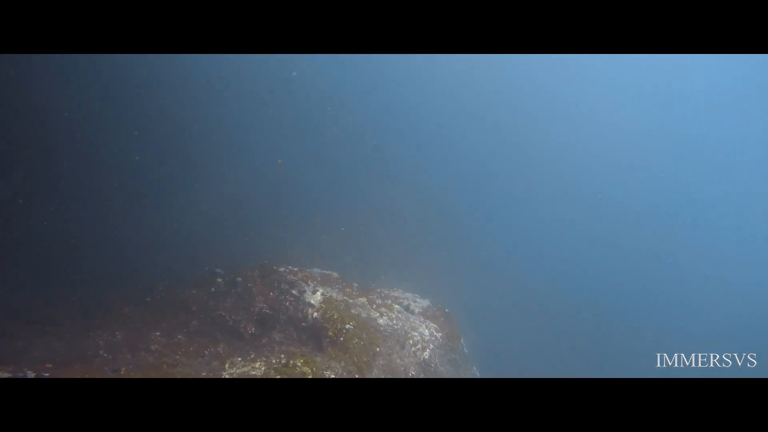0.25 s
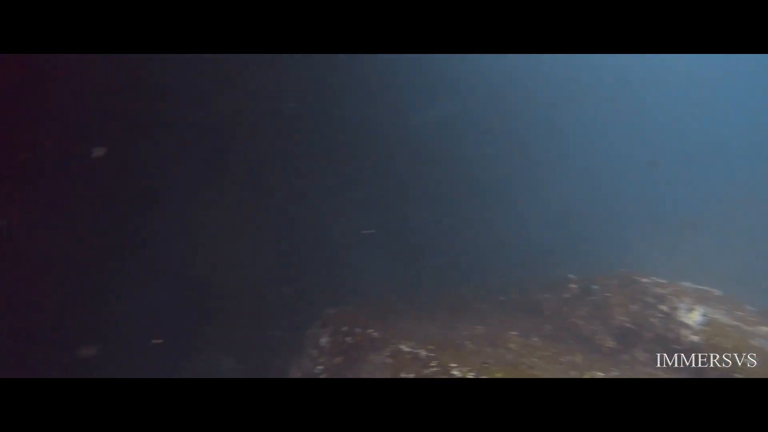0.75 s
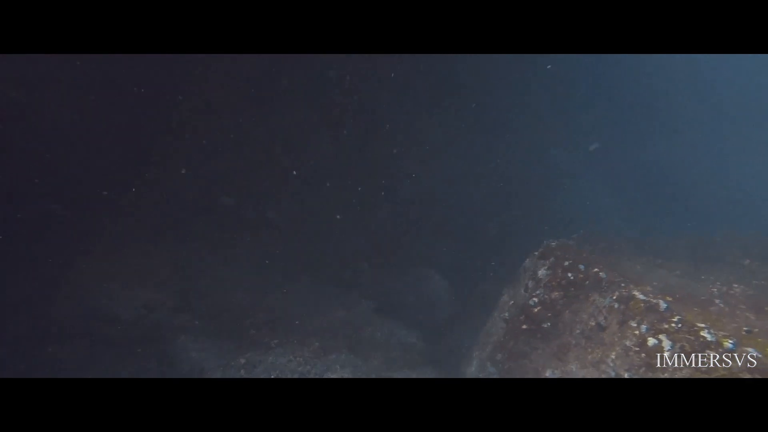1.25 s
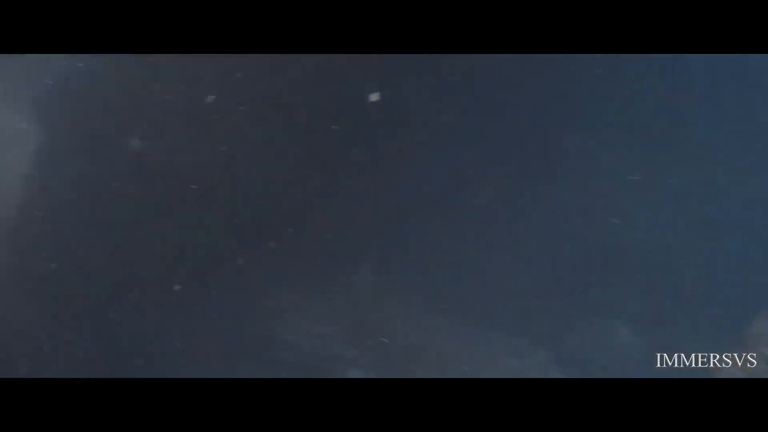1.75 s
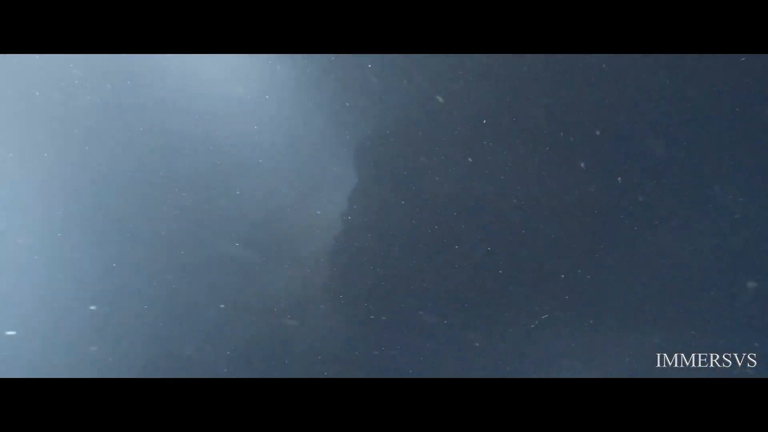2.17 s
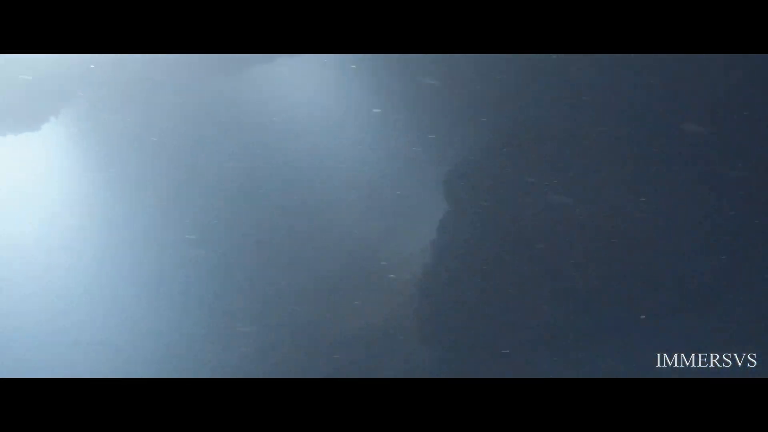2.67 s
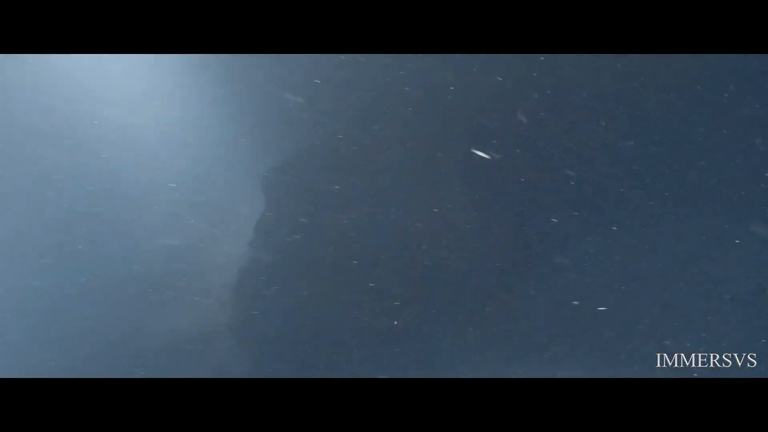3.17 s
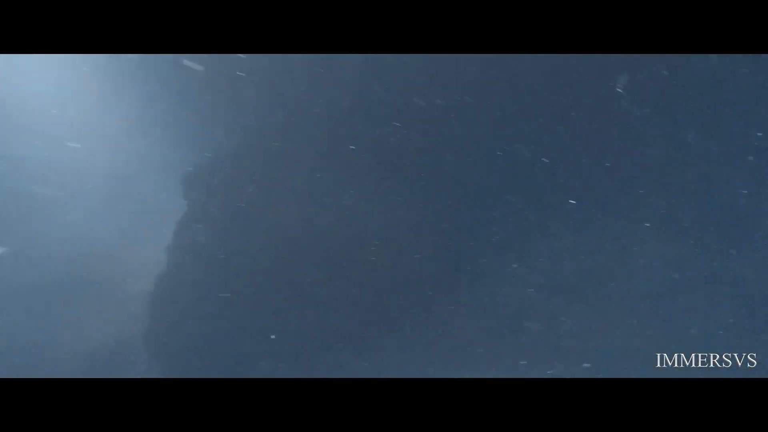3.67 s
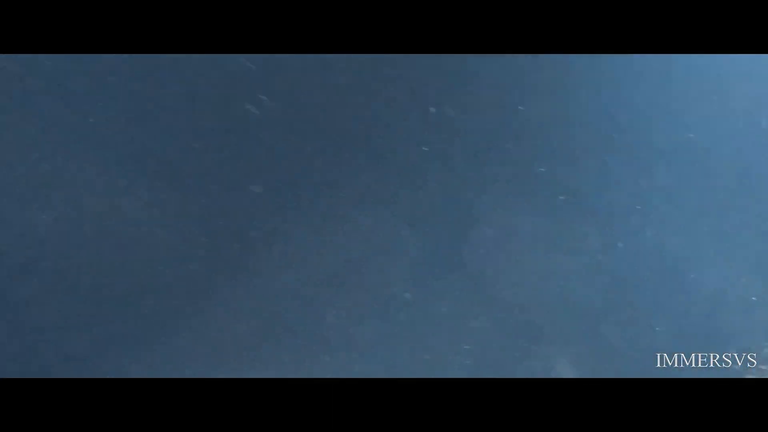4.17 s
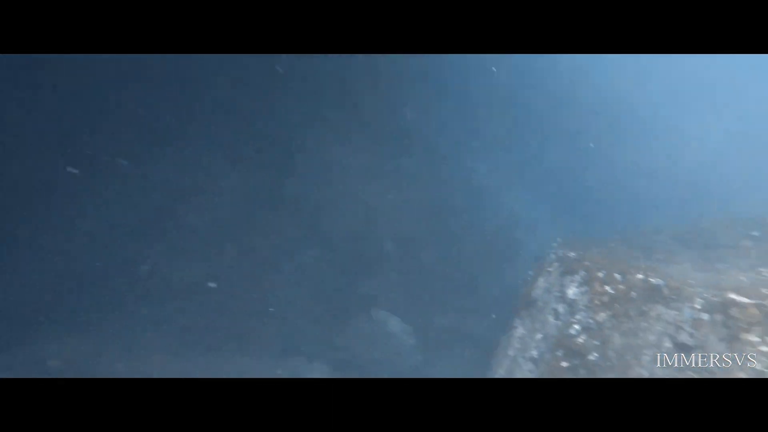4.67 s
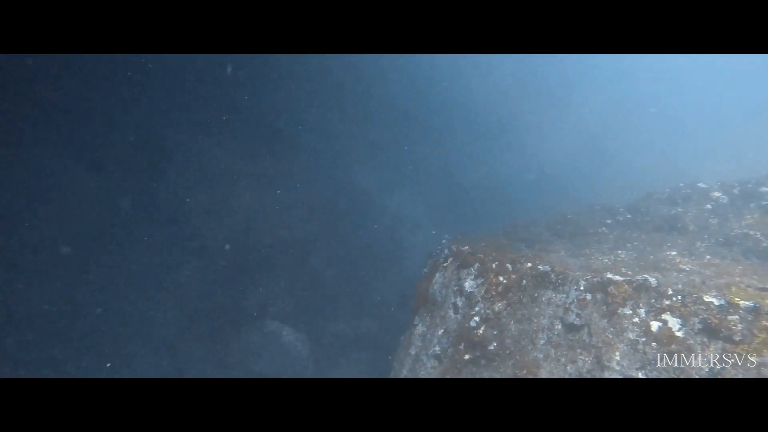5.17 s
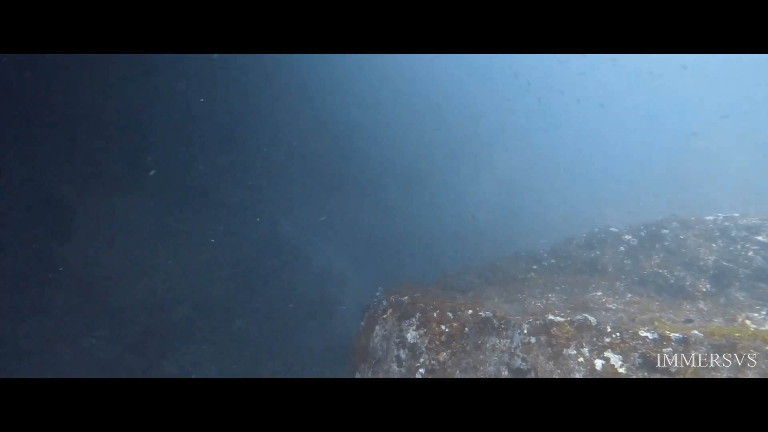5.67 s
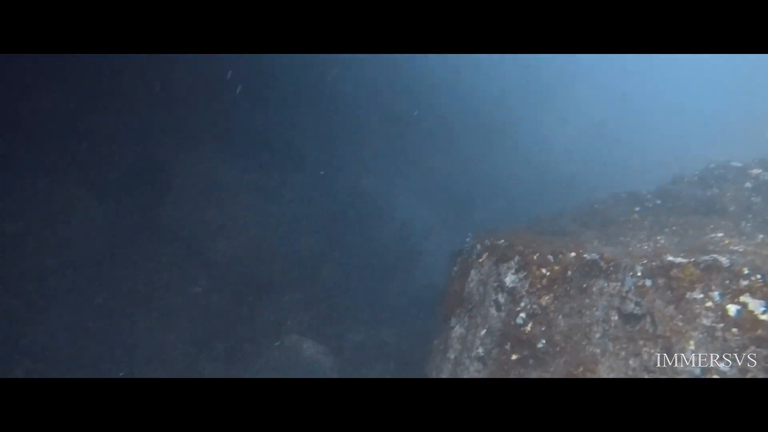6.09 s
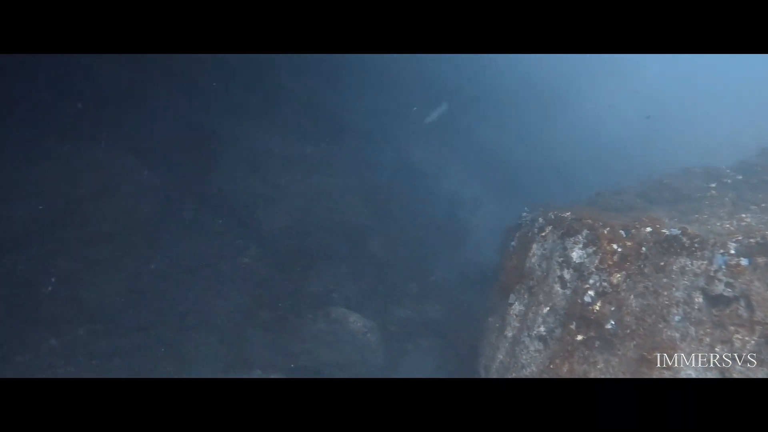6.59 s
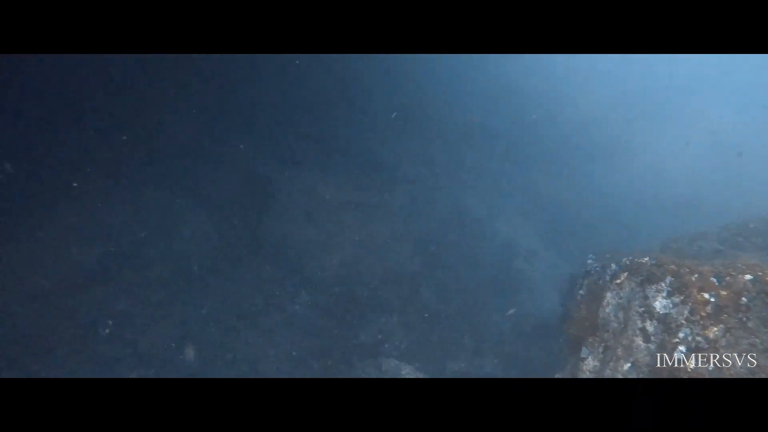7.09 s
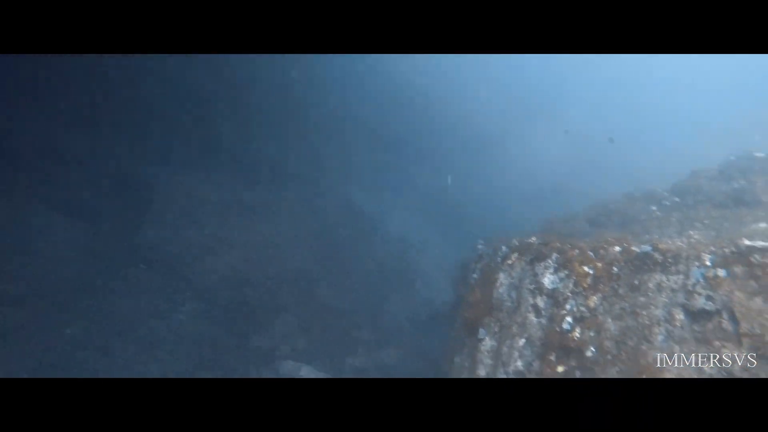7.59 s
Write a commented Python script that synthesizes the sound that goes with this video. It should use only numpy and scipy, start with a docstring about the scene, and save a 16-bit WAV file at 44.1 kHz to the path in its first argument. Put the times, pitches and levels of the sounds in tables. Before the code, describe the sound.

Countless small shrimp snaps fizz and pop around a submerged microphone, with brighter echoing cracks, dull low thumps and faint water rumbling underneath.

```python
"""Snapping shrimp crackle all around a camera in a dive housing that drifts over a rocky reef.
Near shrimp are sharp cracks with a wash of rock echoes; far ones are a fizz of countless small ticks over noise.
The resonances of the housing colour them all. Ringing modes make one short rattle of the housing and its soft
bumps, stick-slip pulses make the grip rub, and filtered noise makes the water that rumbles past."""
import sys
import numpy as np
from scipy import signal
from scipy.fft import rfft, irfft
from scipy.io import wavfile

SR = 44100
rng = np.random.default_rng(int(sys.argv[2]) if len(sys.argv) > 2 else 0)


def wrap_up_sound(samples):
    """Save the sound to the file named by the first command line argument, as 16-bit audio."""
    columns = np.atleast_2d(samples).T
    # keep every value between -1 and 1, then stretch to whole-number steps
    tamed = np.clip(columns, -1, 1)
    steps = np.round(tamed * 32767).astype(np.int16)
    wavfile.write(sys.argv[1], SR, steps)


N = 345744

PIVOT_HZ = 3750  # spectral tilts turn around this pitch
CUTOFF_HZ = 15400  # top of the microphone signal
SIZE = 8192  # samples in a filter, an echo tail or a struck mode
HZ = np.maximum(np.arange(SIZE // 2 + 1) * SR / SIZE, 1)
AGE = np.arange(SIZE) / SR  # seconds since an event began


def from_db(db):
    """Decibels to gain."""
    return 10 ** (np.asarray(db) / 20)


def rms_one(x):
    """Scale to an rms of one."""
    return x / np.sqrt(np.mean(x ** 2) + 1e-20)


def in_time(rows):
    """Draw straight lines between the rows of a curve: each column at every sample."""
    s, *columns = np.transpose(rows)
    return [np.interp(np.arange(N) / SR, s, c) for c in columns]


def add(out, s, sound):
    """Mix a sound in at a time in seconds."""
    start = max(int(s * SR), 0)
    out[start:start + len(sound)] += sound[:N - start]


def butter(x, hz, kind, order=2):
    """Butterworth filter: a smooth low or high cut."""
    sos = signal.butter(order, np.clip(hz, 10, .45 * SR), kind, fs=SR, output="sos")
    return signal.sosfilt(sos, x)


def impulse(gain):
    """The most compact causal pulse with this spectrum (minimum phase), scaled to an energy of one."""
    cepstrum = irfft(np.log(gain / gain.max() + 1e-5))
    # fold the cepstrum onto positive time
    cepstrum[1:SIZE // 2] *= 2
    cepstrum[SIZE // 2 + 1:] = 0
    pulse = irfft(np.exp(rfft(cepstrum)))
    return pulse / np.linalg.norm(pulse)


def colour(x, gain):
    """Pass a sound through a causal filter with the shape of this spectrum."""
    return signal.oaconvolve(x, impulse(gain))[:len(x)]


def hump(hz, width_hz):
    """A resonance peak of height one."""
    return 1 / (1 + (2 * (HZ - hz) / width_hz) ** 2)


def resonances(table):
    """Gain of a set of resonance peaks, summed in power."""
    return np.sqrt(sum((from_db(db) * hump(hz, width)) ** 2 for hz, width, db in table))


def ring(hz, t60):
    """A struck mode: a sine that falls by 60 dB in t60 seconds."""
    return np.sin(2 * np.pi * hz * AGE) * from_db(-60 * AGE / t60)


def near_snaps(echo_trim_db=1):
    """The nearest shrimp: single loud cracks, each with its own pitch and echo."""
    # The nearest snaps. Each row: start in seconds, crack level in dB, pitch favoured by the path in Hz,
    # its emphasis in dB, echo level in dB ahead of the trim.
    cracks = [(0.147, -33.5, 3310, 49, -52), (0.3403, -21, 5600, 18, -41), (0.371, -34.5, 8160, 9, -53),
              (0.5997, -35, 6800, 36, -40), (0.67, -29.5, 4200, 6, -43), (0.6956, -23.5, 11200, 8.5, -58),
              (0.7226, -36, 2800, 2, -45), (0.771, -31.5, 4100, 19, -60), (0.832, -40.5, 4100, 23, -63),
              (1.083, -36, 4340, 9, -54), (1.3476, -33, 2210, 7, -54), (1.594, -43, 3400, -1, -43),
              (1.6854, -45, 4500, 6, -37.5), (1.8983, -33.5, 3340, 19, -41), (1.955, -36, 2200, 1, -50),
              (2.029, -43, 2200, 10, -46), (2.186, -34.5, 5660, 15, -47.5), (2.2545, -42.5, 1990, 14, -50),
              (2.2674, -41, 2000, 8, -45), (2.4614, -37.5, 4960, 7, -50), (2.6467, -32, 4900, 15, -58),
              (2.6838, -35.5, 8000, 13, -43.5), (2.734, -39.5, 6840, 11, -45.5),
              (2.8355, -31.5, 3680, 7, -51), (2.857, -28, 4550, 15, -44), (2.9845, -37.5, 6000, 16, -62),
              (3.0428, -40, 3250, 8, -45), (3.1615, -29.5, 4050, 9.5, -40), (3.399, -35, 9500, -4, -43),
              (3.5622, -46, 11300, 11, -50), (3.9311, -36, 2250, 9, -38.5), (4.028, -44, 7100, 16, -43),
              (4.3075, -35.5, 6200, 4, -40), (4.4148, -36, 7050, 20, -58), (4.5303, -31.5, 3940, 22, -40.5),
              (4.6694, -30.5, 6500, 8, -43), (5.0145, -42, 6900, 18, -45), (5.1286, -41, 13300, 25, -53),
              (5.1607, -23, 3940, 3, -37.5), (5.2043, -30, 7450, 13, -41), (5.5415, -31.5, 3400, 19, -40.5),
              (5.586, -45, 1960, 13, -39.5), (5.748, -39.5, 6100, 5, -40), (5.8775, -29, 5850, 8, -41),
              (5.9638, -30.5, 5600, 11, -36), (5.996, -42, 3660, 17, -60), (6.103, -46, 7200, 14, -43.5),
              (6.2304, -39, 3400, 9, -47), (6.3264, -39, 12900, 14, -52), (6.364, -32, 7940, 12, -44),
              (6.4077, -42, 6800, 7, -48), (6.477, -34.5, 3240, 28, -47), (6.5936, -31, 7260, 17.5, -41),
              (6.693, -38, 10900, 8, -54), (6.7135, -32.5, 4100, 18, -42.5), (6.883, -36.5, 10200, 15, -44),
              (7.0566, -32, 4000, 9, -41.5), (7.1131, -39.5, 6100, 16, -55),
              (7.1631, -29.5, 6800, 8.5, -40.5), (7.56, -47, 5100, 5, -45.5), (7.6535, -21, 8750, 22, -37),
              (7.685, -34.5, 4000, 36, -44.5), (7.702, -34.5, 7900, 13, -44.5)]
    out = np.zeros(N)
    for s, crack_db, favoured_hz, favour_db, echo_db in cracks:
        add(out, s, snap(crack_db, favoured_hz, favour_db, echo_db + echo_trim_db))
    return out


def snap(crack_db, favoured_hz, favour_db, echo_db, crack_s=0.0056, tilt_db=-0.43, echo_tilt_db=-1.0,
         echo_share=0.71, smear_s=0.001, smear=0.23, low_cut_hz=1700, patchy_db=1.2):
    """A claw snap is one collapsing bubble: a crack smeared by paths through the housing, then echoes."""
    own = from_db(favour_db * hump(favoured_hz, favoured_hz / 2))
    # the direct click, then a dense fading scatter
    paths = (AGE == 0) + smear * rng.standard_normal(SIZE) * np.exp(-AGE / smear_s)
    crack_gain = housing(tilt_db, low_cut_hz) * own * path_colour(patchy_db)
    crack = colour(paths, crack_gain)
    # the echoes keep only a share of the favoured pitch
    echo_gain = housing(echo_tilt_db, low_cut_hz) * own ** echo_share * path_colour(patchy_db)
    echoes = colour(rock_echoes(), echo_gain)
    # crack_db is the rms the crack's energy would have if spread over crack_s
    crack *= np.sqrt(crack_s * SR) / np.linalg.norm(crack)
    return from_db(crack_db) * crack + from_db(echo_db) * echoes


def housing(tilt_db, low_cut_hz=1150, tilt_end_hz=8000):
    """Gain of the housing walls: they resonate and shut out the bass; the tilt in dB per octave sets brightness."""
    # Housing resonances that waterborne sound comes through.
    # Each row: pitch in Hz, width in Hz, relative height in dB.
    wall_peaks = [(1267, 305, -9), (1793, 244, -6), (2093, 312, 1), (2668, 410, -8), (3455, 560, -4),
                  (3837, 410, -2), (4530, 410, -11), (5340, 500, -6.5), (6200, 910, -5), (6960, 1100, -4),
                  (7540, 750, -6), (8850, 730, -8), (9480, 930, -10.5), (11620, 1560, -13.5),
                  (13100, 3200, -13), (14750, 1500, -21)]
    octaves = np.log2(np.clip(HZ, low_cut_hz, tilt_end_hz) / PIVOT_HZ)
    bass_cut = 1 / np.sqrt(1 + (low_cut_hz / HZ) ** 8)
    return resonances(wall_peaks) * bass_cut * from_db(tilt_db * octaves)


def path_colour(spread_db, count=26):
    """Every path through the rocks cancels some pitches and favours others, here at random."""
    knots_hz = np.linspace(0, CUTOFF_HZ, count)
    return from_db(spread_db * np.interp(HZ, knots_hz, rng.standard_normal(count)))


def rock_echoes(early_t60=0.12, late_t60=0.31, late_db=-6, uneven_db=3):
    """Many uneven reflections: a quick burst from near rocks together with a longer, weaker wash."""
    # the strength jumps every 64 samples
    strengths = from_db(uneven_db * np.repeat(rng.standard_normal(SIZE // 64), 64))
    paths = rms_one(rng.standard_normal(SIZE) * strengths)
    decay = from_db(-60 * AGE / early_t60) + from_db(late_db - 60 * AGE / late_t60)
    onset = np.minimum(AGE / 0.0018, 1)
    return paths * decay * onset


def scattered_snaps(level_db=-44.5, spread_db=3.3, echo_db=-52, echo_spread_db=3, centre_hz=5400,
                    spread_octaves=0.65, favour_db=12, count=46):
    """Shrimp a little farther off snap at chance moments, each by a path of its own."""
    out = np.zeros(N)
    # one snap at a random moment in each equal slot
    times = (np.arange(count) + rng.random(count)) * N / SR / count
    for s, (size, pitch, wet) in zip(times, rng.standard_normal((count, 3))):
        crack_db = level_db + spread_db * size
        favoured_hz = centre_hz * 2 ** (spread_octaves * pitch)
        add(out, s, snap(crack_db, favoured_hz, favour_db, echo_db + echo_spread_db * wet))
    return out


def far_snaps(per_s=450, size_db=12.5, largest=3, grain_db=-3.5, wash_db=-6.5, wash_tilt_db=-2.0,
              favour_db=14, wet_db=-27, patchy_db=5.0, low_hz=3000, high_hz=13000, count=20):
    """The colony: countless small snaps of many favoured pitches over the smooth wash of the farthest."""
    # Loudness of the colony as the camera drifts over it. Each row: time in seconds, rms level in dB.
    loudness = [(0.0, -46.5), (1.0, -46.8), (1.4, -47.5), (1.68, -47), (2.0, -49), (2.2, -49.5),
                (2.45, -47), (3.4, -44), (3.82, -51.5), (4.62, -45.5), (5.0, -49), (5.3, -50), (5.8, -51.5),
                (6.1, -46.5), (6.42, -51), (7.0, -48), (7.4, -50.5), (7.84, -51)]
    colony_db, = in_time(loudness)
    grains, walls = np.zeros(N), housing(wash_tilt_db)
    # each pitch group shares one tick, struck at random moments and sizes
    for hz in np.geomspace(low_hz, high_hz, count):
        born = rng.random(N) < per_s / count / SR
        sizes = from_db(size_db * np.minimum(rng.exponential(1, N), largest))
        gain = walls * from_db(favour_db * hump(hz, hz / 2))
        click = (AGE == 0) + from_db(wet_db) * rock_echoes()
        tick = colour(click, gain * path_colour(patchy_db)) * np.linalg.norm(gain)
        grains += signal.oaconvolve(born * sizes, tick)[:N]
    wash = colour(rng.standard_normal(N), walls)
    fizz = from_db(grain_db) * rms_one(grains) + from_db(wash_db) * wash
    return from_db(colony_db) * rms_one(fizz)


def rattle(low_cut_hz=850):
    """Something hard bounces on the housing; each contact rings it with a brightness of its own."""
    # Hard contacts of a short rattle. Each row: start in seconds, peak in dB ahead of the final rounding,
    # contact cut-off in Hz.
    contacts = [(0.6106, -2, 2300), (0.617, -13, 4500), (0.6211, -3.5, 2770), (0.6274, 4.5, 6140),
                (0.6345, -2.5, 6300)]
    # What the struck housing rings with. Each row: pitch in Hz, typical strength in dB, decay t60 in seconds.
    shell_modes = [(460, -13.5, 0.028), (926, -13, 0.018), (1084, -19, 0.041), (1185, -6.5, 0.027),
                   (1387, -11, 0.025), (1570, -5.5, 0.0091), (1840, -19, 0.015), (2310, -5.5, 0.011),
                   (2714, -7.5, 0.027), (2850, -5.5, 0.014), (3730, -1.5, 0.0094), (4300, 2, 0.0075),
                   (5880, -3.5, 0.005), (6860, 0, 0.0037), (10900, 10, 0.0053), (13500, -26, .003)]
    out = np.zeros(N)
    for s, peak_db, contact_hz in contacts:
        # every contact excites the modes a little differently
        strengths = from_db(1.5 * rng.standard_normal(len(shell_modes)))
        modes = np.zeros(SIZE)
        for k, (hz, db, t60) in enumerate(shell_modes):
            sign = (-1) ** (k // 2)
            modes += sign * strengths[k] * from_db(db) * ring(hz, t60)
        knock = butter(modes, contact_hz, "low", order=3)
        knock = butter(knock, low_cut_hz, "high")
        add(out, s, from_db(peak_db) * knock / np.abs(knock).max())
    return out


def thumps():
    """The firmer bumps of the grip, each a dull thud with some sway."""
    # Soft bumps of the grip. Each row: start in seconds, thud peak in dB, pitch in Hz,
    # sway of the whole housing in dB ahead of the trim in bump().
    bumps = [(0.003, -30.5, 109, -54), (0.177, -46, 258, -57), (0.311, -42.5, 126, -43),
             (0.61, -32.5, 125, -43), (0.622, -31.5, 385, -42), (2.0, -46.5, 170, -56),
             (2.101, -42, 175, -46), (2.68, -34.5, 228, -54), (2.704, -38, 178, -61),
             (2.727, -40, 170, -53), (2.7993, -30.5, 315, -49), (2.801, -28.5, 170, -34),
             (3.02, -37, 170, -69), (3.471, -23, 187, -58), (3.492, -26, 152, -56),
             (3.515, -28.5, 165, -38), (3.67, -44, 158, -57), (4.793, -34, 105, -36),
             (4.803, -31, 234, -56), (4.88, -46.5, 210, -48), (5.255, -45, 146, -35.5),
             (5.538, -46.5, 160, -56), (5.956, -37, 170, -35), (5.961, -42, 85, -53)]
    out = np.zeros(N)
    for s, peak_db, hz, sway_db in bumps:
        add(out, s, bump(peak_db, hz, sway_db))
    return out


def bump(peak_db, hz, sway_db, cycles=5.5, soft_hz=380, hollow_hz=80, sway_hz=62, sway_t60=0.25, sway_trim_db=-2):
    """A padded bump gives a few dull cycles and leaves the housing swaying."""
    thud = butter(ring(hz, cycles / hz), soft_hz, "low", order=3)
    thud = butter(thud, hollow_hz, "high", order=1)
    sway = butter(ring(sway_hz, sway_t60), soft_hz, "low")
    return from_db(peak_db) * thud / np.abs(thud).max() + from_db(sway_db + sway_trim_db) * sway


def fidgets(from_s=1.3, to_s=3.7, level_db=-53, spread_db=2.5, pitch_hz=190, spread_octaves=.4,
            sway_db=-60, count=14):
    """While the camera is turned the grip shifts in many faint bumps."""
    out = np.zeros(N)
    times = from_s + (to_s - from_s) * (np.arange(count) + rng.random(count)) / count
    for s, (size, pitch) in zip(times, rng.standard_normal((count, 2))):
        hz = pitch_hz * 2 ** (spread_octaves * pitch)
        add(out, s, bump(level_db + spread_db * size, hz, sway_db))
    return out


def rub(jitter=0.24, soft_hz=620, rasp_top_hz=1700, uneven_db=3, attack_s=0.004, release_s=0.0041,
        slowing_per_s=2.0):
    """Stick and slip: uneven slips drive dull resonances and a rasp, and slow down as the grip settles."""
    # The grip slides over the housing. Each row: start in seconds, length in seconds, level in dB,
    # typical slips per second at the start, rasp in dB relative to the dull body.
    slides = [(3.249, 0.048, -38, 175, -11.5), (3.349, 0.14, -38, 225, -38)]
    # Dull resonances of the grip. Each row: pitch in Hz, width in Hz, relative height in dB.
    grip_peaks = [(170, 180, 0), (332, 61, -16), (480, 180, -26)]
    # Resonances of its rasp. Each row: pitch in Hz, width in Hz, relative height in dB.
    rasp_peaks = [(510, 300, 0), (850, 220, 2.5), (1450, 400, -3)]
    out, age = np.zeros(N), np.arange(2 * SIZE) / SR
    for s, length_s, level_db, per_s, rasp_db in slides:
        wander = rms_one(butter(rng.standard_normal(len(age)), 90, "low"))
        rate = per_s * np.exp(jitter * wander - slowing_per_s * np.minimum(age, length_s))
        # one pulse each time the running count of slips passes a whole number
        slips = np.diff(np.floor(np.cumsum(rate) / SR), prepend=-1)
        slips = slips * from_db(uneven_db * rng.standard_normal(len(age)))
        body = butter(colour(slips, resonances(grip_peaks)), soft_hz, "low")
        body = butter(body, 98, "high")
        rasp = butter(colour(slips, resonances(rasp_peaks)), rasp_top_hz, "low", order=4)
        rasp = butter(rasp, 300, "high")
        release = np.exp(-np.maximum(age - length_s, 0) / release_s)
        pressure = np.minimum(age / attack_s, 1) * release
        add(out, s, from_db(level_db) * pressure * (rms_one(body) + from_db(rasp_db) * rms_one(rasp)))
    return out


def flow(trim_db=-0.5, steady_db=-53, eddy_hz=130):
    """Eddies on the housing swell and fade in the bass; above them the sea murmurs evenly."""
    # Water flowing past. Each row: time in seconds, gain of the eddies in dB ahead of the trim.
    swells = [(0.0, -44), (0.45, -52.5), (0.8, -41.5), (1.15, -53), (1.66, -60), (2.09, -51), (2.55, -52.5),
              (2.82, -47), (3.0, -50), (3.7, -48.5), (4.45, -53.5), (5.05, -58), (5.6, -56), (6.2, -53),
              (7.0, -54.5), (7.84, -53)]
    # Spectrum of the water. Each row: pitch in Hz, relative density in dB per Hz.
    rumble = [(12, 1.5), (28, -0.5), (50, 4), (75, -5), (110, -9), (200, -18.5), (400, -22), (700, -29),
              (1100, -25.5), (2000, -15.5), (5000, -89)]
    flow_db, = in_time(swells)
    hz, db = np.transpose(rumble)
    gain = from_db(np.interp(np.log(HZ), np.log(hz), db))
    water = colour(rng.standard_normal(N + SIZE), gain)[SIZE:]  # drop the filter's run-in
    eddies = butter(water, eddy_hz, "low", order=3)
    murmur = butter(water, eddy_hz, "high", order=3)
    return from_db(flow_db + trim_db) * eddies + from_db(steady_db) * murmur


def scene():
    """Shrimp, handling and water at one microphone."""
    shrimp = near_snaps() + scattered_snaps() + far_snaps()
    handling = rattle() + thumps() + fidgets() + rub()
    return (shrimp + handling + flow())[None]


def record(dry):
    """The loudest peaks are rounded off and the top is cut steeply."""
    rounded = .9 * np.tanh(dry / .9)
    return signal.sosfilt(signal.ellip(10, .2, 80, CUTOFF_HZ, fs=SR, output="sos"), rounded)


dry = scene()
out = record(dry)
wrap_up_sound(out)
```